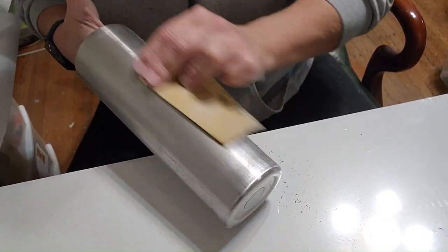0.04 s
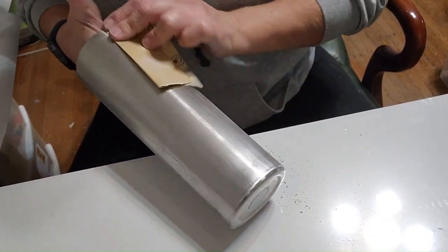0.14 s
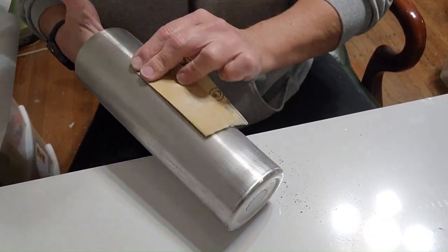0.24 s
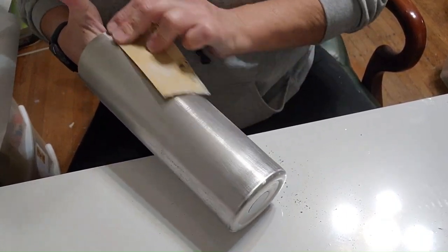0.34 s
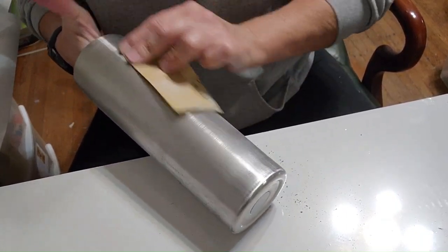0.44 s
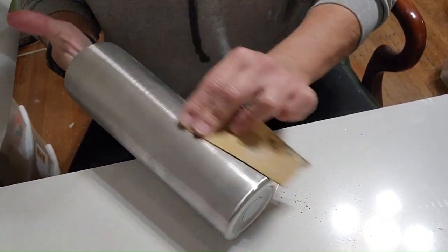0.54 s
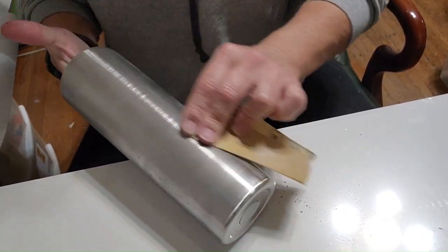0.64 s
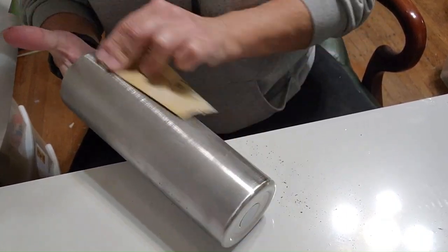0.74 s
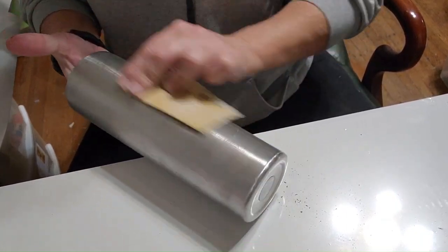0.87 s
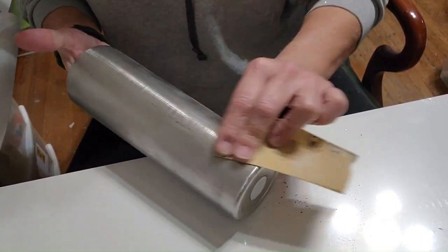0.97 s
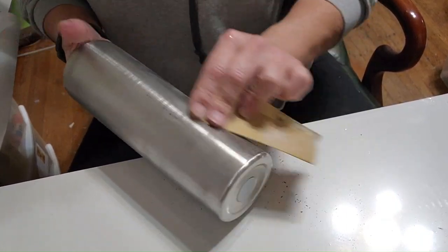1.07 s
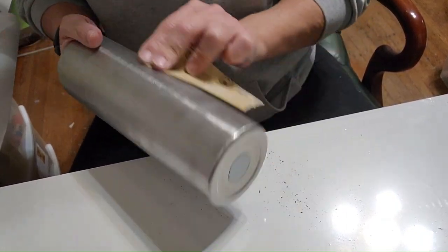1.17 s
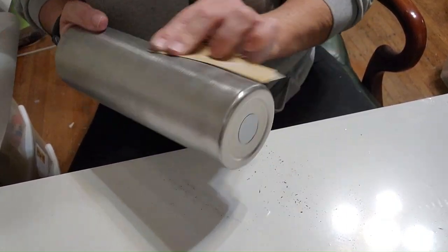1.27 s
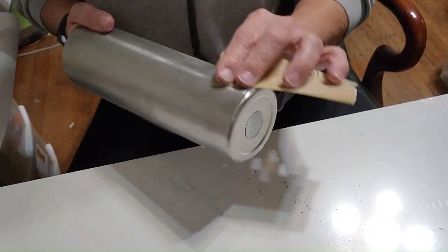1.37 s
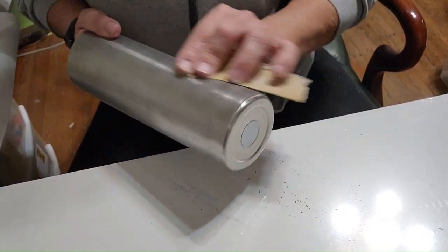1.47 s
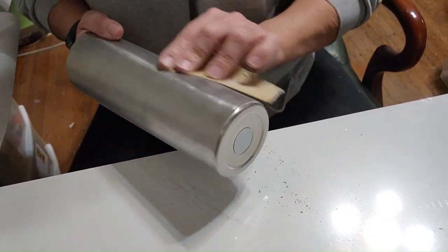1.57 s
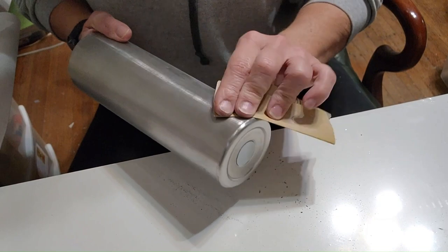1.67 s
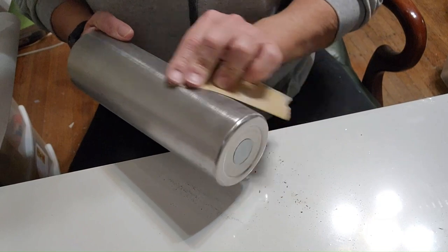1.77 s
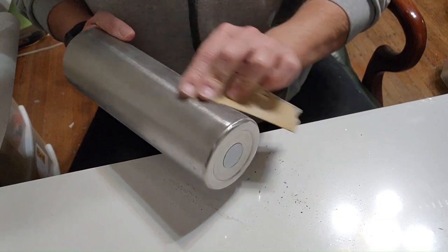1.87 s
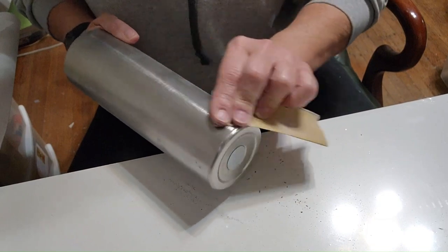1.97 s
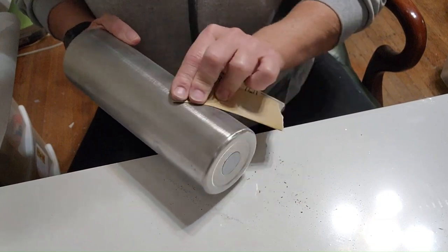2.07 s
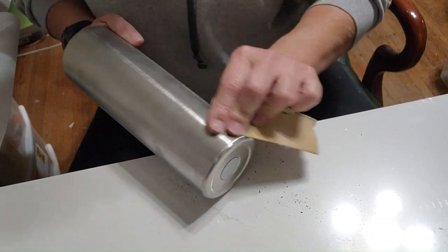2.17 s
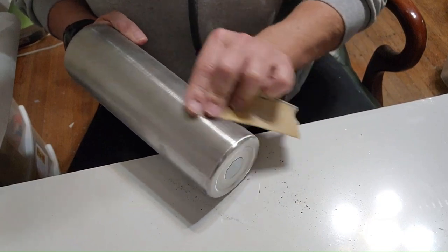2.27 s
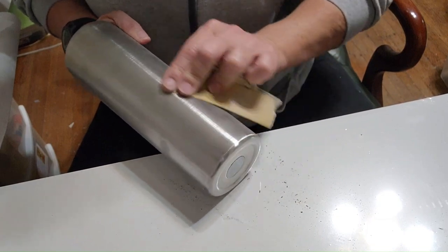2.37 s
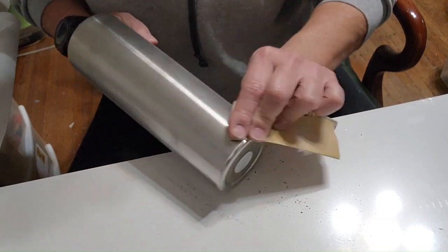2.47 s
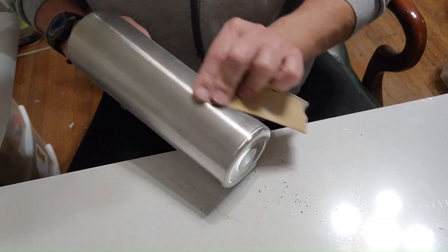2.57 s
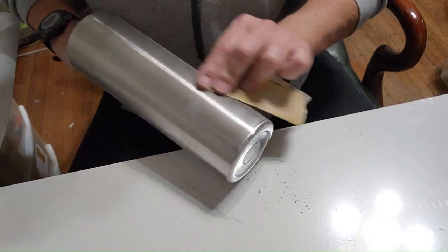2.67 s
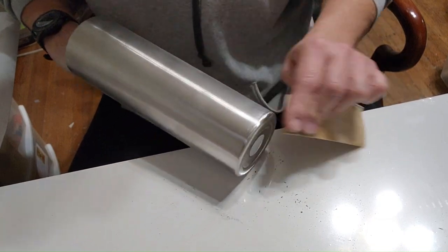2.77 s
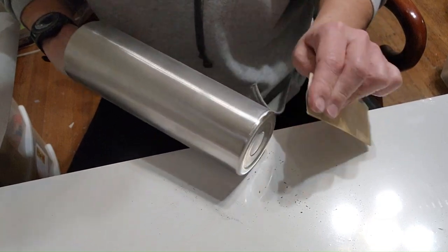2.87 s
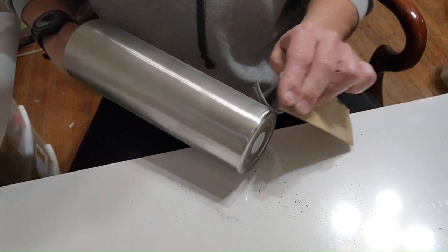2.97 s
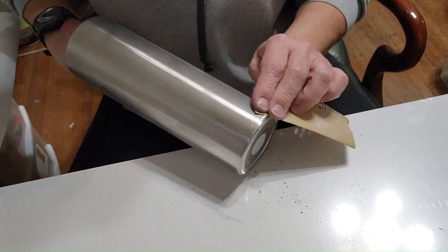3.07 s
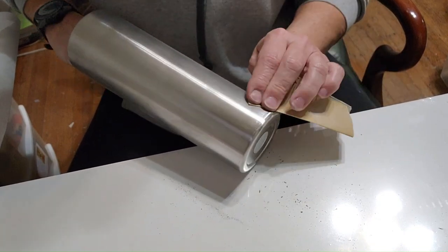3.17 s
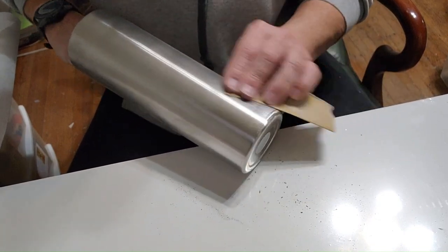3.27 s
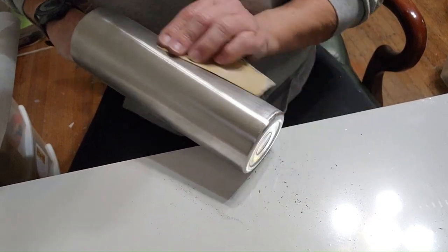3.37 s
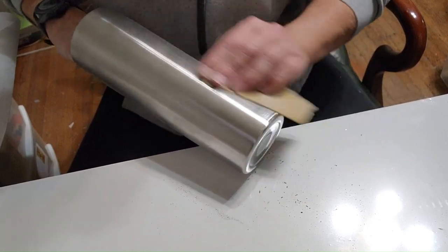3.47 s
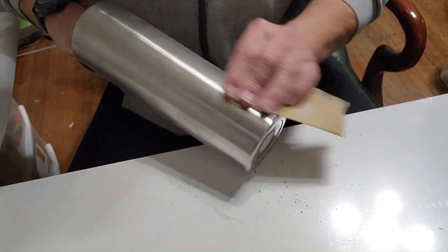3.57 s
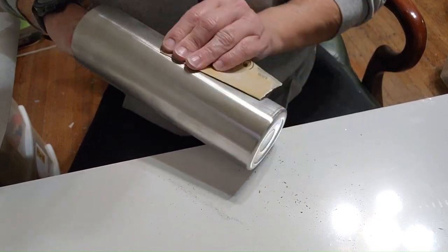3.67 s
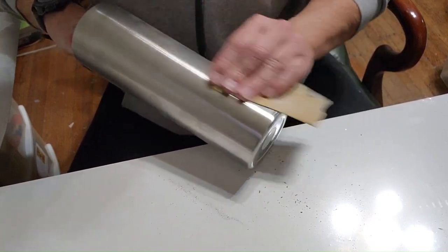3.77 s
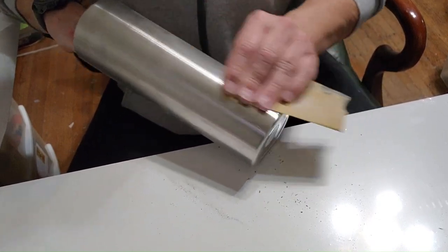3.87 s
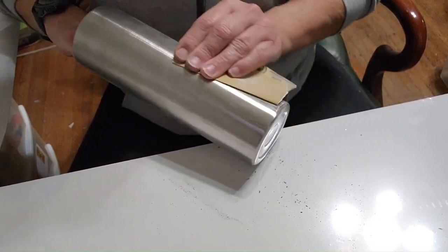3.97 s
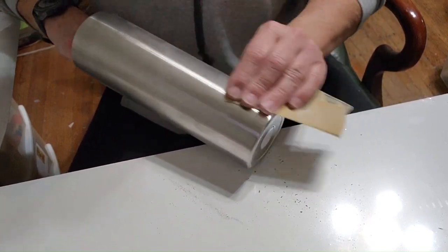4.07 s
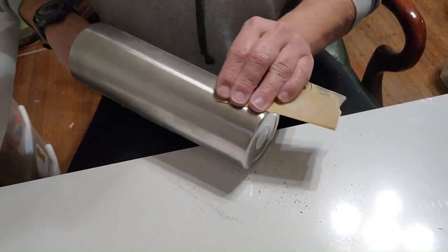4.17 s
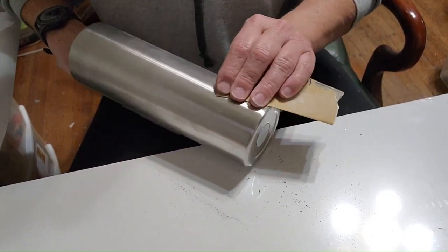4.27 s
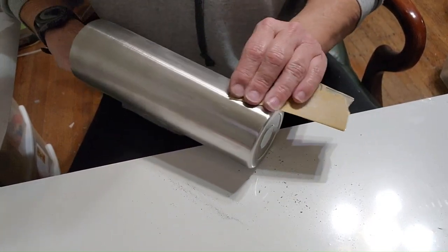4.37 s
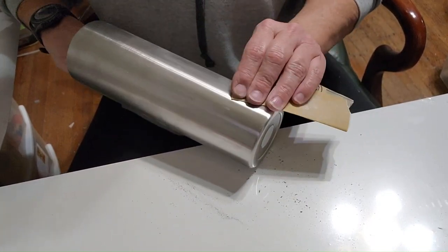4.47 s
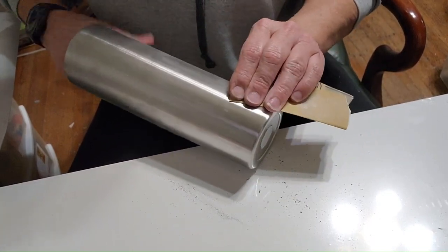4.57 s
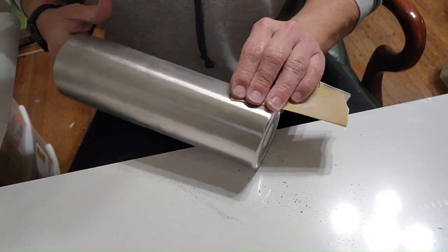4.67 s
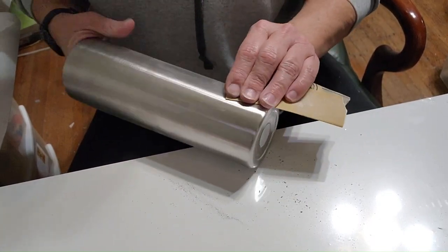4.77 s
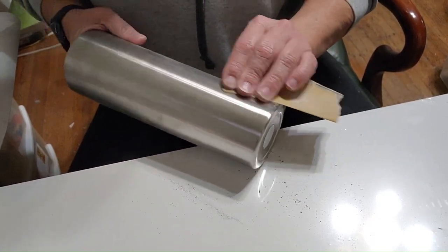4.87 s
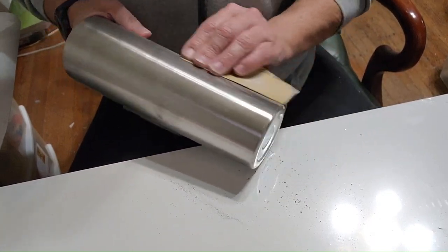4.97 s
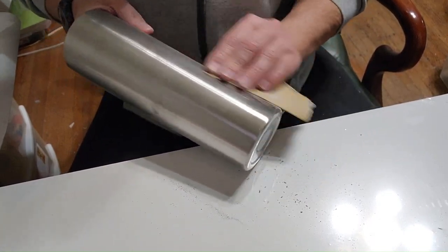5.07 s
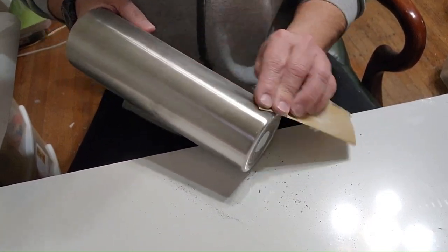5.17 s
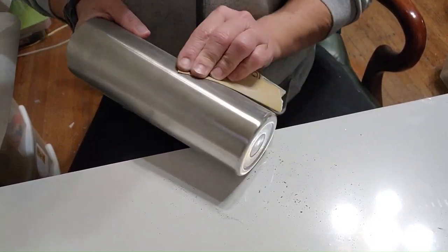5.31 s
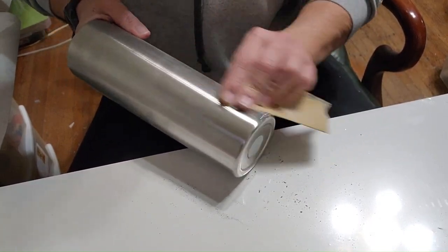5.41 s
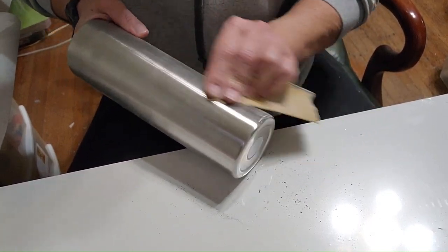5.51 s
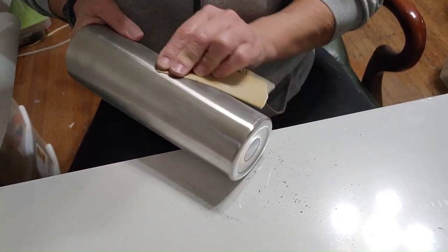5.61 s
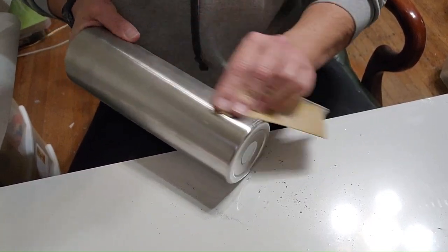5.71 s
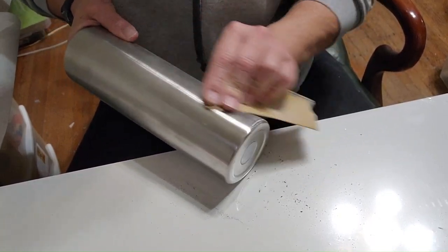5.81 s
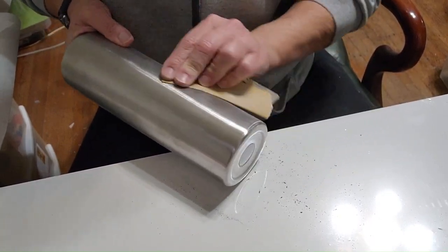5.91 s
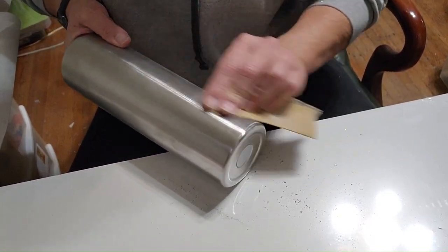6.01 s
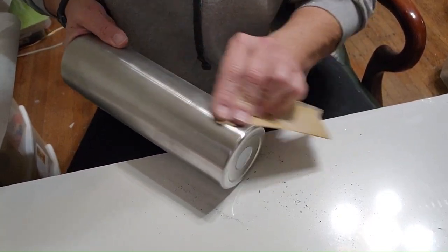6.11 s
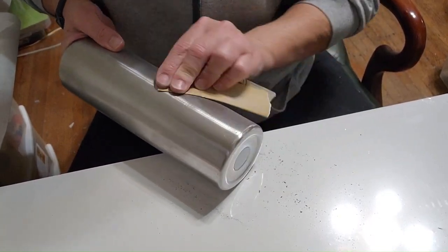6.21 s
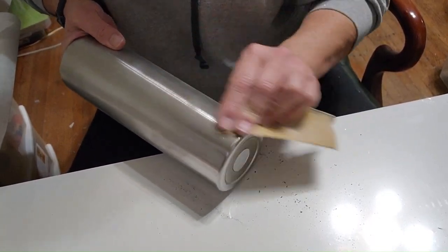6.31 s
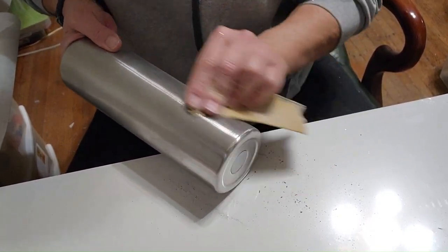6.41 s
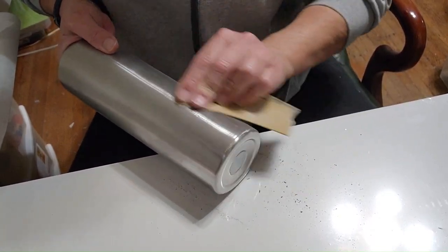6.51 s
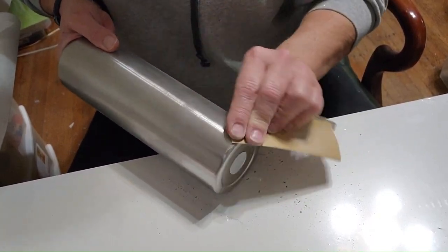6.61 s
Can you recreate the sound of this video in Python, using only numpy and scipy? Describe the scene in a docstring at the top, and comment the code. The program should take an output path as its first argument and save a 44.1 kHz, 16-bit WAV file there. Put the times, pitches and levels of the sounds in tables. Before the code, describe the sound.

Quick dry strokes of grit hiss on a thin steel wall, each swelling and stopping at the turn. Two dull, bouncing knocks of the cup's base on a tabletop interrupt early on. The paper lifts twice and lands with small ticks; a gentle thud precedes the last run of firm sanding. Close-miked, short room tail, very quiet air with a thin whine.

```python
"""A small room: close to a pair of microphone ports, a steel cup held over a table is sanded by hand.
Quick back-and-forth strokes of grit, made of shaped noise, hiss on the wall and leave it ringing.
The rubbing hand makes the cup rumble and the table top mirrors the hiss; the paper lifts off twice and ticks as it lands.
The cup's base knocks on the table twice and is later set down softly: decaying modes with a dull crack.
Faint room air with a thin whine lies underneath."""
import sys
import numpy as np
from scipy import signal
from scipy.fft import rfft, irfft, next_fast_len
from scipy.io import wavfile
from scipy.ndimage import uniform_filter1d, map_coordinates

SR = 44100
rng = np.random.default_rng(int(sys.argv[2]) if len(sys.argv) > 2 else 0)


def wav_out(sig):
    """Save sig, one row per channel (or a flat mono array), as 16-bit PCM at SR to the path in sys.argv[1]."""
    wavfile.write(sys.argv[1], SR, np.round(np.clip(np.atleast_2d(sig).T, -1, 1) * 32767).astype(np.int16))


N = 293265


def undb(db):
    """Turn dB into an amplitude factor."""
    return 10 ** (np.asarray(db) / 20)


def at(points, hz):
    """Read (frequency [Hz], value) points on a log-frequency axis."""
    f, v = np.transpose(points)
    return np.interp(np.log(hz + 1), np.log(f), v)


def colour(x, db_of_hz):
    """Filter by a gain curve in dB."""
    n = x.shape[-1]
    size = next_fast_len(n + 2048)
    hz = np.arange(size // 2 + 1) * SR / size
    return irfft(rfft(x, size) * undb(db_of_hz(hz)), size)[..., :n]


def unit(x):
    """Scale to an RMS of 1."""
    return x / np.sqrt(np.mean(x ** 2))


def bump(f, hz, width_hz):
    """Bell of a resonance, 1 at its centre."""
    return 1 / (1 + (2 * (f - hz) / width_hz) ** 2)


def ease(u):
    """Rise smoothly from 0 to 1 as u goes from 0 to 1."""
    return np.sin(np.pi / 2 * np.clip(u, 0, 1)) ** 2


def walk(rate):
    """Smooth random drift with an RMS near 1, taking a new target `rate` times a second."""
    k = max(int(SR / rate), 1)
    steps = np.repeat(rng.standard_normal(N // k + 1), k)
    return unit(uniform_filter1d(steps, k)[:N])


def delay(x, ms):
    """Delay by a fixed or moving time."""
    return map_coordinates(x, [np.arange(N) - ms * SR / 1000], order=3)


def add(out, x, s):
    """Mix x into out at time s."""
    i = int(round(s * SR))
    x = x[max(-i, 0):max(N - i, 0)]
    out[max(i, 0):max(i, 0) + len(x)] += x


def both_ports(x, lead_ms=0.16):
    """Direct sound reaches the left port first."""
    return np.array([x, delay(x, lead_ms)])


# colour of the room air: (frequency [Hz], relative density [dB per Hz])
AIR_COLOUR = [(25, -16), (50, 4.5), (100, 7), (200, -8), (350, -11.5), (520, -21), (800, -11.5),
              (1100, -22.5), (2500, -40), (6000, -29), (15000, -59)]
AIR_DB, WHINE_HZ, WHINE_WIDTH_HZ, WHINE_DB = -56, 726, 8.5, -69.5


def air():
    """Quiet room noise, partly shared by the ports, with a faint whine whose pitch wavers."""
    common, left, right = rng.standard_normal((3, N))
    noise = unit(colour(common + .5 * np.array([left, right]), lambda f: at(AIR_COLOUR, f)))
    noise = noise * undb(2 * walk(4.89))
    whine_hz = WHINE_HZ + WHINE_WIDTH_HZ * walk(60)
    whine = unit(np.sin(2 * np.pi * np.cumsum(whine_hz) / SR))
    return undb(AIR_DB) * noise + undb(WHINE_DB) * whine


# a stroke of usual length speeds up and slows down in these times;
# longer strokes take longer, by this power of their length
USUAL_S, SPEED_UP_S, SLOW_DOWN_S, EASE_POWER = .14, 0.031, 0.045, 0.39
# the lightest stroke takes this much longer to get going
LIGHT_EASE_S = 0.03
# pressure change from start to end: the hand eases off on the way out and leans in on the way back
OUT_LEAN_DB, BACK_LEAN_DB = -3, 2.5


def stroke(start, length, outward, light):
    """Motion of one stroke: its samples, the share of the way done, the hand's speed and its pressure."""
    i = np.arange(max(int(start * SR), 0), min(int((start + length) * SR), N))
    t = i / SR - start
    slowness = (length / USUAL_S) ** EASE_POWER
    speed_up = ease(t / (SPEED_UP_S * slowness + light * LIGHT_EASE_S))
    slow_down = ease((length - t) / (SLOW_DOWN_S * slowness))
    along = t / length
    lean_db = OUT_LEAN_DB if outward else BACK_LEAN_DB
    return i, along, speed_up * slow_down, undb(lean_db * (along - .5))


# hiss of grit on steel: (frequency [Hz], relative density [dB per Hz])
GRIT_COLOUR = [(300, -39), (600, -67), (1000, -25.5), (1500, -19), (2100, -7), (3400, -6.5), (4200, -3.5),
               (6000, 1), (8200, 2), (9700, -2.5), (11000, -6), (12700, -2.5), (15500, 0.5), (17000, -5)]
# resonances of the scratched wall: (frequency [Hz], width [Hz], lift [dB])
WALL_RESONANCES = [(1273, 33, 5), (2103, 24, -2), (2510, 590, -2.5), (3083, 85, 4), (3700, 59, 6.5),
                   (4064, 204, 4.5), (6060, 90, 0), (7490, 103, 9), (7900, 103, 2.5), (10460, 300, 2)]


def grit_noise(grain_db=3.5, chatter_db=0.22, shared=0.59, bite_db=2.5, bite_hz=3200, bite_width_hz=2500):
    """Endless scratch: noise grains of uneven size, coloured by the grit and the wall's resonances."""
    grains = rng.standard_normal((3, N))
    size_db = grain_db * np.minimum(rng.exponential(size=(3, N)), 5)
    grains = grains * undb(size_db) * undb(chatter_db * walk(170))
    # the paper touches along a whole line, so each port hears a partly different set of grains
    grains = grains[1:] + shared * both_ports(grains[0])
    grit = unit(colour(grains, lambda f: at(GRIT_COLOUR, f)
                       + sum(db * bump(f, hz, width) for hz, width, db in WALL_RESONANCES)))
    # the coarsest grains bite and let go within a stroke
    bite = colour(grit, lambda f: 20 * np.log10(bump(f, bite_hz, bite_width_hz)))
    return grit + bite * (undb(bite_db * walk(35)) - 1)


# rumble of the rubbed cup in the hand: (frequency [Hz], relative density [dB per Hz])
RUMBLE_COLOUR = [(25, -18), (55, 2.5), (105, -2), (140, -0.5), (180, 2), (225, -1.5), (310, 2), (370, 0),
                 (440, -21), (540, -42.5), (720, -5.5), (900, -22), (2000, -20.5)]


def cup_shake(judder_db=3.0):
    """Endless low noise of the cup shaken in the hand, with a judder in its level."""
    noise = unit(colour(rng.standard_normal(N), lambda f: at(RUMBLE_COLOUR, f)))
    return noise * undb(judder_db * walk(15))


# strokes, alternately out and back along the cup; the row at 2.96 s is only a barely audible scrape between
# strokes that still counts in the alternation: (start [s], length [s], relative level [dB])
STROKES_OUT_AND_BACK = [(-.1, 0.14, -26), (.019, 0.14, -26.5), (.158, 0.12, -26.5), (.278, 0.12, -27.5),
                        (.396, 0.23, -28), (.622, 0.2, -30), (.81, .19, -28), (.955, 0.28, -37),
                        (1.233, 0.19, -33), (1.422, 0.14, -32), (1.567, 0.15, -30), (1.703, 0.13, -30.5),
                        (1.835, 0.14, -29), (1.975, .130, -30), (2.105, 0.12, -29), (2.226, 0.15, -31),
                        (2.372, 0.14, -28.5), (2.505, 0.15, -31.6), (2.659, 0.13, -35), (2.96, 0.082, -62),
                        (3.045, 0.16, -46), (3.208, 0.23, -33.5), (3.423, 0.15, -30.5), (3.558, .151, -30),
                        (3.707, 0.15, -29.5), (3.86, 0.13, -29.5), (3.984, .14, -30.5), (4.13, 0.1, -40.5),
                        (4.318, 0.11, -39.5), (4.472, 0.44, -62), (4.66, 0.055, -50), (4.828, 0.2, -35.5),
                        (5.031, .16, -34), (5.183, .16, -32), (5.339, 0.14, -31), (5.471, 0.16, -28.5),
                        (5.623, 0.15, -29.5), (5.772, 0.15, -29.5), (5.912, 0.14, -30),
                        (6.055, 0.14, -29.5), (6.188, 0.13, -29.5), (6.324, 0.13, -28.5),
                        (6.452, 0.13, -28), (6.584, 0.17, -29)]
# slow changes as the hands shift on the cup: (time [s], lift of the wall resonance under the grip [dB],
# rasp [dB], sizzle [dB], relative rumble [dB])
GRIP_SHIFTS = [(0.05, 7.5, -8, 2.5, -31), (.7, 2.5, 0.5, -0.5, -38), (1.3, -1.5, -7, 1, -44),
               (1.8, -5, 2.5, 0.5, -41), (2.25, -0.5, -1.5, -2.5, -37.5), (2.7, 1, -2, -1, -38),
               (3.12, 2.5, -5.5, -1, -30), (3.33, 2, -3, 2.5, -42), (3.75, -6.5, 0, 1, -32),
               (4.15, -4, 1, 4, -30.5), (5.1, 2.5, -3, 2.5, -33), (5.7, 3, -2, -1, -30.5),
               (6.25, 3.5, -2.5, 0, -29), (6.63, 0.5, -2, -3, -26.5)]
# how much the colour changes from place to place on the wall: (frequency [Hz], spread [dB])
PATCHY_WALL = [(600, 6), (3000, 4.5), (6000, 2.5), (14000, 2)]
# colour of slowly moving grit against grit at full speed: (frequency [Hz], gain [dB])
SLOW_GRIT_COLOUR = [(1500, 15), (4000, 7.5), (8000, -6.5), (13000, -24)]
# from firm to light strokes the paper lies ever more loosely, rasps more and sizzles less
FIRM_DB, LIGHT_DB, LIGHT_RASP_DB, LIGHT_SIZZLE_DB = -33, -42.5, 11.5, -6.5
# outward strokes shake the cup more; below a faint level the rumble fades with the hiss
OUT_RUMBLE_DB, FAINT_DB = 2.5, -42


def sanding(hiss_db=1.88, rumble_db=-20, grip_hz=3500, grip_width_hz=900,
            mirror=0.059, mirror_ms=0.814, travel_ms=0.24, drag=0.32):
    """Each stroke speeds up, scratches and stops to turn round; returns hiss and rumble."""
    grit, shake = grit_noise(), cup_shake()
    hiss, rumble, place = np.zeros((2, N)), np.zeros(N), np.zeros(N)
    spots_hz = np.geomspace(600, 16000, 56)
    patches = rng.standard_normal((len(STROKES_OUT_AND_BACK), 2, len(spots_hz)))
    grip_s, *grip_curves = np.transpose(GRIP_SHIFTS)
    for k, (start, length, db) in enumerate(STROKES_OUT_AND_BACK):
        outward = k % 2 == 0
        light = ease((FIRM_DB - db) / (FIRM_DB - LIGHT_DB))
        i, along, speed, lean = stroke(start, length, outward, light)
        middle = start + length / 2
        grip_db, rasp_db, sizzle_db, low_db = (np.interp(middle, grip_s, curve) for curve in grip_curves)
        # light, loose paper rasps; firm paper sizzles
        rasp_db = rasp_db + light * LIGHT_RASP_DB
        sizzle_db = sizzle_db + light * LIGHT_SIZZLE_DB
        tone = [(700, rasp_db / 2), (2400, rasp_db), (5500, 0), (8500, 0), (13000, sizzle_db)]
        # every grip damps the wall a little differently
        gripped = colour(grit[:, i], lambda f: at(tone, f) + grip_db * bump(f, grip_hz, grip_width_hz))
        # the wall answers differently at the two ends of the travel
        first, last = (colour(gripped, lambda f: at(PATCHY_WALL, f) * np.interp(f, spots_hz, patch))
                       for patch in patches[k])
        scratch = first + ease(along) * (last - first)
        # near the turn the grains pass too slowly to make the highest treble
        dull = colour(scratch, lambda f: at(SLOW_GRIT_COLOUR, f))
        moving = dull + speed * (scratch - dull)
        hiss[:, i] += moving * speed * lean * undb(db)
        shake_db = low_db + outward * OUT_RUMBLE_DB + min(db - FAINT_DB, 0)
        rumble[i] += shake[i] * speed ** drag * lean * undb(shake_db)
        place[i] += (-1) ** k * np.cos(np.pi * along)
    # the echo off the table top shifts as the hand travels, so its comb sweeps through the hiss
    echo = np.array([delay(port, mirror_ms + travel_ms * place) for port in hiss])
    return undb(hiss_db) * (hiss + mirror * echo), undb(rumble_db) * rumble


# thin ringing tones of the steel wall: (frequency [Hz], width [Hz], relative level [dB])
SINGING_TONES = [(1267, 13, -13), (2013, 11.8, -5.5), (2770, 21, -9), (4120, 19, 2.5), (4920, 12, 5),
                 (7420, 38, -2.5)]


def singing(hiss, sing_db, yielding=0.75, fall_s=0.12, wander_db=3):
    """The wall rings on after the grit; firm pressure damps it, so it grows more slowly than the hiss."""
    # the driving power falls 30 dB in fall_s
    keep = np.exp(-np.log(1e3) / (fall_s * SR))
    power = signal.lfilter([1 - keep], [1, -keep], hiss[0] ** 2) + 1e-12
    drive, tones = rng.standard_normal((2, N)), 0
    for hz, width_hz, db in SINGING_TONES:
        mode = signal.lfilter(*signal.iirpeak(hz, hz / width_hz, fs=SR), drive)
        # each tone comes and goes as the paper crosses its nodes
        tones = tones + mode * undb(db + wander_db * walk(6))
    return unit(tones) * undb(sing_db + yielding * 10 * np.log10(power))


def ring(modes, t):
    """Decaying modes after a unit tap."""
    return sum(undb(db - 60 * t / t60) * np.cos(2 * np.pi * hz * t) for hz, db, t60 in modes)


# slow bending modes of the table top: (frequency [Hz], relative level [dB], t60 [s])
BENDING_MODES = [(134, -15.5, 0.12), (171, -8, 0.11), (200, -15, 0.08)]
# modes of the table top: (frequency [Hz], relative level [dB], t60 [s])
TABLE_MODES = [(53.3, -19, .5), (102.66, -23, 0.72), (256.5, -8, 0.12), (323, 3, 0.069), (367, -7, 0.079),
               (458, -8.5, 0.14), (585, -26, .07)]
# modes of the cup: (frequency [Hz], relative level [dB], t60 [s])
CUP_MODES = [(595, -10.5, 0.15), (642, -4, 0.086), (713, -5.5, 0.13), (764, -26.5, 0.27), (750, -24, 0.1),
             (986, -26, 0.14), (1151, -12, 0.1), (1230, -22, .12), (1880, -7, 0.048)]
# dull crack of each contact: (frequency [Hz], relative density [dB per Hz])
THUD_COLOUR = [(40, -23), (100, -11.5), (200, 0), (370, 5.5), (510, -17), (750, 3.5), (1020, -20),
               (1400, -10), (2000, -6), (3000, -8), (5000, -27), (12000, -30)]
# knocks of the base on the table: (time [s], relative level [dB], contact [ms], first bounce gap [s],
# loss per bounce [dB], share of the table's slow bending [dB], share of the cup's own ring [dB])
BASE_KNOCKS = [(0.8967, -.5, 0.84, .0096, 3, -18, -2), (0.9316, -11.5, 1.2, 0.011, 12, -6, 7),
               (.988, -17.5, 1.8, 0.0082, 9, 8.5, -16), (2.1634, 0, 1.6, .0076, 9.5, 3.5, 1),
               (2.235, -22.5, 2, .02, 6.5, 8, -7), (4.791, -8, 10.8, 0.0104, 19, 5.5, 2),
               (4.814, -17, 3.1, 0.019, 10, 9, -3)]
# each bounce gap's share of the one before
BOUNCE_SHRINK = .92
# the rim grazes the table just before the base lands: how early and how much weaker
GRAZE_LEAD_S, GRAZE_LOSS_DB = 0.0095, 14


def knocks(ring_db=-11.5, thud_db=-14.5, thud_t60=0.096, radiate_hz=45, count=5):
    """The base bounces on the table ever sooner and weaker; a softer contact leaves out the upper modes."""
    out, t = np.zeros(N), np.arange(int(.7 * SR)) / SR
    bending, table, cup = ring(BENDING_MODES, t), ring(TABLE_MODES, t), ring(CUP_MODES, t)
    noise = rng.standard_normal((len(BASE_KNOCKS), count + 1, len(t)))
    thuds = unit(colour(noise, lambda f: at(THUD_COLOUR, f))) * undb(-60 * t / thud_t60)
    for (s, db, contact_ms, gap_s, loss_db, bend_db, cup_db), cracks in zip(BASE_KNOCKS, thuds):
        modes = undb(ring_db) * (table + undb(bend_db) * bending + undb(cup_db) * cup)
        # smooth force pulse of the contact
        u = t[:400] * 1000 / contact_ms
        push = u * np.exp(-2 * np.pi * u)
        graze = [(s - GRAZE_LEAD_S, db - GRAZE_LOSS_DB)]
        bounces = [(s + gap_s * sum(BOUNCE_SHRINK ** j for j in range(k)), db - k * loss_db)
                   for k in range(count)]
        for (when, level_db), thud in zip(graze + bounces, cracks):
            hit = signal.fftconvolve(modes + undb(thud_db) * thud, push / push.sum())
            add(out, undb(level_db) * hit, when)
    # a table top radiates the lowest bass poorly
    return signal.sosfilt(signal.butter(2, radiate_hz, "high", fs=SR, output="sos"), out)


# tick of the paper's edge: (frequency [Hz], relative density [dB per Hz])
TICK_COLOUR = [(300, -2), (1000, -7), (2000, -12), (4200, 0.5), (8000, -6), (11000, -9), (16000, -26)]
# the stiff paper touches down on the steel: (time [s], relative level [dB], t60 [s])
PAPER_TOUCHES = [(2.973, -55.5, .06), (3.045, -46, 0.036), (3.076, -57, 0.027), (4.344, -36, 0.065),
                 (4.689, -55, .05)]


def touches():
    """Short dry ticks, decaying noise, where the paper lands again after a pause."""
    out, t = np.zeros(N), np.arange(int(.15 * SR)) / SR
    noise = rng.standard_normal((len(PAPER_TOUCHES), len(t)))
    ticks = unit(colour(noise, lambda f: at(TICK_COLOUR, f)))
    for (s, db, t60), tick in zip(PAPER_TOUCHES, ticks):
        add(out, tick * undb(db - 60 * t / t60), s)
    return out


# decay of the room's tail: (frequency [Hz], t60 [s])
ROOM_DECAY = [(100, 0.63), (400, 0.35), (1500, 0.3), (6000, 0.15), (15000, 0.17)]


def room(x, early_db, tail_db, early_t60, shared_hz=600):
    """Near surfaces scatter the sound at both ports and the walls add a short tail."""
    t = np.arange(int(.6 * SR)) / SR
    mid, side = rng.standard_normal((2, len(t)))
    # long waves are alike at both ports
    side = colour(side, lambda f: 20 * np.log10((f + 1) / np.hypot(f, shared_hz)))
    noise = np.array([mid + side, mid - side]) / np.sqrt(2)
    tail = 0
    for hz, t60 in ROOM_DECAY:
        # one overlapping band around each frequency
        share = [(corner, float(corner == hz)) for corner, _ in ROOM_DECAY]
        band = colour(noise, lambda f: 20 * np.log10(at(share, f) + 1e-9))
        tail = tail + band * undb(-60 * t / t60)
    tail = tail * ease(t / 0.028)
    early = noise[:, ::-1] * undb(-60 * t / early_t60) * ease(t / 0.0011)
    response = (undb(early_db) * unit(early) + undb(tail_db) * unit(tail)) / np.sqrt(len(t))
    return x + signal.fftconvolve(x, response, axes=1)[:, :N]


def scene():
    """Hiss, ring, rumble, knocks and ticks in the room, over its quiet air."""
    hiss, rumble = sanding()
    scratching = room(hiss + singing(hiss, sing_db=-28.5), early_db=-4, tail_db=-10, early_t60=0.049)
    handling = room(both_ports(rumble + touches()), early_db=2.0, tail_db=-4.5, early_t60=0.092)
    knocking = room(both_ports(knocks()), early_db=-6, tail_db=-16.0, early_t60=0.046, shared_hz=350)
    return scratching + handling + knocking + air()


# how much louder the left port hears than the right: (frequency [Hz], difference [dB])
PORT_BALANCE = [(60, -3.5), (140, 4), (300, -3), (500, 3.5), (750, -4), (1200, 3), (3000, 4), (4300, 3),
                (6000, 3.5), (8700, 4.5), (10000, 1), (11600, 6.5), (13500, 1), (15500, 3.5)]
TOP_HZ = 15800


def record(dry):
    """The two ports have their own colour; a steep low-pass cuts the top."""
    ports = colour(dry, lambda f: np.array([[.5], [-.5]]) * at(PORT_BALANCE, f))
    return signal.sosfilt(signal.ellip(12, .1, 80, TOP_HZ, fs=SR, output="sos"), ports)


dry = scene()
out = record(dry)
wav_out(out)
```